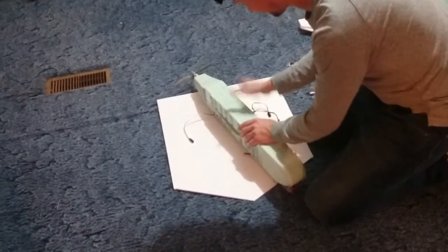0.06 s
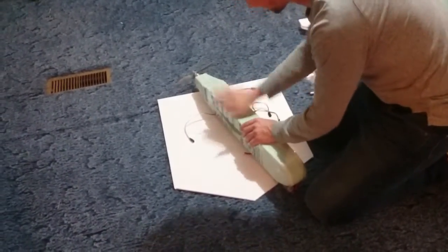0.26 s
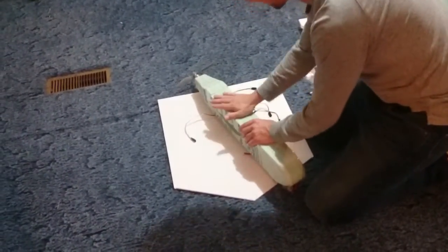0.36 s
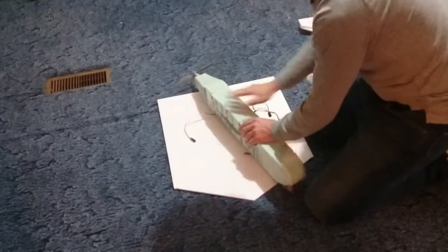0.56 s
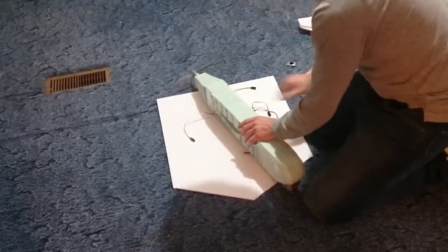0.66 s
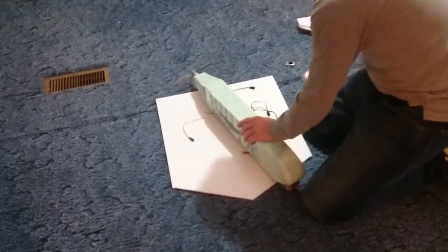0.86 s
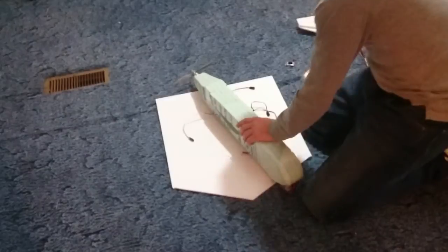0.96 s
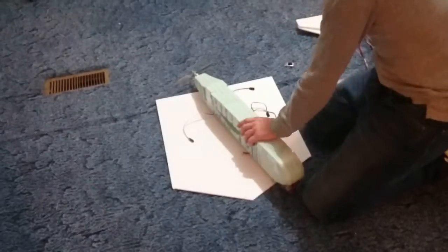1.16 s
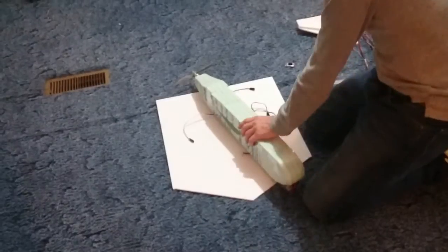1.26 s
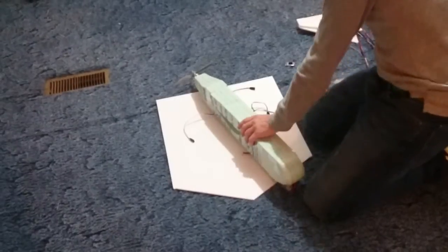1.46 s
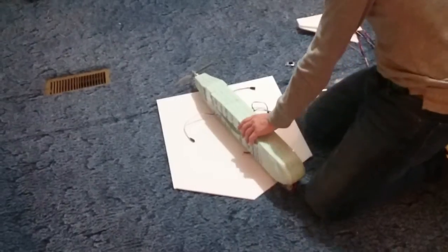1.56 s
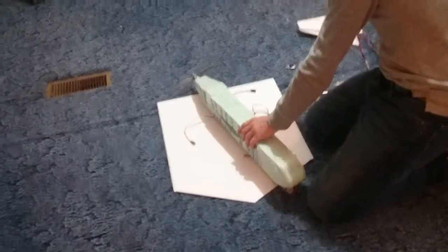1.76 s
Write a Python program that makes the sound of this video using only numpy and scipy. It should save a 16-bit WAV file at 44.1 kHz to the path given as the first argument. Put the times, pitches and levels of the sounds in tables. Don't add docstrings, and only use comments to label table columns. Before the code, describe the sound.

One hard, crackling slap on hollow foam in a small room, then quiet rubbing and plastic ticks

```python
import sys
import numpy as np
from scipy import signal
from scipy.fft import rfft, irfft
from scipy.io import wavfile
from scipy.ndimage import uniform_filter1d

SR = 44100
rng = np.random.default_rng(int(sys.argv[2]) if len(sys.argv) > 2 else 0)


def elevation(decibels):
    levels = np.asarray(decibels, float)
    return 10 ** (levels / 20)


def waveform_to_disk(signal):
    frames = np.transpose(np.atleast_2d(signal))
    scaled = np.clip(frames, -1, 1) * 32767
    samples = np.round(scaled).astype(np.int16)
    wavfile.write(sys.argv[1], SR, samples)


N = 79380
T = np.arange(N) / SR

# pitch_hz, likeness [0-1]
LIKENESS = [(60, 0.22), (500, 0.32), (2000, 0.057), (6000, 0.021), (14000, .01)]
# pitch_hz, t60_s
ROOM_T60 = [(60, 0.33), (500, 0.32), (2000, 0.21), (6000, 0.27), (14000, 0.15)]
ROOM_START_S = .004
# start_s, level_db, length_s, tilt_db [per octave, low over high]
SLAP = [
    (.2144, -25, .0006, 5),
    (.2166, -13, .0004, 5),
    (.2185, -17, .0012, 1),
    (.221, -21, .0015, 0),
    (.2242, -17, .0015, 5),
    (.2298, -16, .0015, -3),
    (.2322, -10, .0005, -4),
    (.2395, -16, .0025, -2),
    (.245, -20, .002, 0),
]


def rms_one(x):
    return x / np.sqrt(np.mean(x ** 2) + 1e-20)


def at_hz(points, hz):
    table_hz, value = np.array(points)[:, 0], np.array(points)[:, 1]
    return np.interp(np.log(hz), np.log(table_hz), value)


def high_pass(x, hz, order=2):
    return signal.sosfilt(signal.butter(order, hz, "high", fs=SR, output="sos"), x)


def drift(rate):
    span = int(SR / 80 / rate)
    slow = uniform_filter1d(rng.standard_normal(N // 40 + 2), span)
    slow = uniform_filter1d(slow, span)
    return np.interp(np.arange(N) / 40, np.arange(len(slow)), rms_one(slow))


def ring(x, hz, t60):
    r = elevation(-60 / (t60 * SR))
    w = 2 * np.pi * hz / SR
    return signal.lfilter([0, np.sin(w)], [1, -2 * r * np.cos(w), r * r], x + 1e-18)


def burst(s, length):
    x = rng.standard_normal(N) * np.exp(-.5 * ((T - s) / length) ** 2)
    return x / np.sqrt(np.sum(x ** 2) + 1e-20)


def bands(white, gain, likeness=LIKENESS):
    out = 0
    edges = 22 * 2 ** np.arange(0, 10, .5)
    for k, (low, high) in enumerate(zip(edges, np.minimum(edges[1:], 19000))):
        band = signal.butter(2, [low, high], "band", fs=SR, output="sos")
        mid, side = signal.sosfilt(band, white[k % 2])
        hz = np.sqrt(low * high)
        alike = np.clip(at_hz(likeness, hz), -1, 1)
        stereo = np.sqrt(1 + alike) * mid + np.sqrt(1 - alike) * side * [[1], [-1]]
        out = out + gain(hz) * stereo
    return out


def floor():
    # pitch_hz, level_db
    air_colour = [(40, -1.5), (90, -2), (180, -9.5), (600, -8.5), (2200, -6), (4200, -5.5), (7300, -20),
                  (16000, -12)]
    # pitch_hz, level_db
    fan_lines = [(120, -87), (126, -81)]
    width_hz = 0.5
    hum = 0
    for hz, db in fan_lines:
        line = ring(rng.standard_normal(N + SR), hz, 6.5 / width_hz)[SR:]
        hum = hum + elevation(db) * rms_one(line)
    air = bands(rng.standard_normal((2, 2, N + SR // 4)), lambda hz: elevation(at_hz(air_colour, hz)))[:, -N:]
    return elevation(-65) * rms_one(air) + hum


def rubs():
    # peak_s, level_db, rise_s, treble_db, body_db
    strokes = [(.004, -50, 0.022, -1.5, 11), (0.143, -57, 0.084, 3, 8), (0.389, -51.5, 0.048, 0.5, 15),
               (0.544, -52.5, 0.063, -1, -0.5), (0.609, -63, 0.17, 1.5, 9.5), (0.7, -58, 0.02, 3.5, 6),
               (0.717, -56.5, 0.079, -3.5, -6), (0.774, -52, 0.0099, 2, 1), (0.843, -60.5, 0.014, 0, -12),
               (0.948, -57, 0.034, 0.5, 16.5), (0.978, -59, 0.049, 2.5, 5), (1.108, -58, 0.039, -5.5, 5),
               (1.196, -54.5, 0.027, -2, -1), (1.278, -54, 0.0044, -0.5, 14.5),
               (1.317, -51.5, 0.05, -6.5, 4.5), (1.384, -57, 0.069, -7, 16), (1.434, -56, 0.064, -14, 2.5),
               (1.532, -60, 0.12, -27.5, 9.5), (1.577, -53, 0.049, -14, 5), (1.7, -60, 0.044, -20, -8),
               (1.749, -51, 0.023, 0.5, 6.5)]
    # pitch_hz, level_db [per Hz]
    colour = [(150, -17), (500, -18), (1300, -11), (2200, 5), (3000, 4.5), (4200, 4), (5800, -2),
              (16000, -7)]
    fall_s, grains_per_s, grain_db = 0.035, 2500, 1
    patchy_db, patches_per_s = 2, 18.4
    s, db, rise, treble_db, body_db = np.transpose(strokes)[:, :, None]
    envelope = np.where(T < s, np.exp(-2 * ((T - s) / rise) ** 2), np.exp(-(T - s) / fall_s))
    shape = elevation(db) * envelope

    strength = elevation(grain_db * np.minimum(rng.exponential(1, (2, 2, N)), 5))
    grains = strength * rng.choice([-1, 1], (2, 2, N))
    grains = grains * (rng.random((2, 2, N)) < grains_per_s / SR)

    def stroke_level(hz):
        treble = treble_db * np.clip(np.log2(hz / 5000), 0, 1)
        body = body_db * np.clip(np.log2(2200 / hz), 0, 1)
        return np.sqrt(((shape * elevation(treble + body)) ** 2).sum(axis=0))

    def gain(hz):
        return elevation(at_hz(colour, hz) + patchy_db * drift(patches_per_s)) * stroke_level(hz)

    scale = np.std(bands(grains, lambda hz: elevation(at_hz(colour, hz))))
    return bands(grains, gain) / scale


def creaks():
    # start_s, level_db, length_s, pitch_hz, t60_s
    slips = [(1.57, -51, .008, 1290, .022), (1.564, -52, .007, 1780, .02), (1.573, -56, .006, 2680, .015),
             (.2319, -10, .0004, 6050, .004), (1.315, -56, .015, 2070, .02), (1.31, -57, .015, 3300, .012),
             (.328, -45, .006, 2250, .01), (1.74, -49, .006, 2200, .015), (1.11, -62, .008, 2220, .015),
             (.008, -54, .008, 3600, .012), (.2324, -13, .0004, 2600, .008)]
    out = 0
    for s, db, length, hz, t60 in slips:
        y = ring(ring(burst(s, length), hz, t60), hz, t60 / 4)
        out = out + elevation(db) * y / np.abs(y).max()
    return out


def ticks():
    # start_s, level_db [peak], low_ring_db, treble_db, pan_db [left over right]
    contacts = [(0.0325, -46.5, -10, 15, 10), (0.064, -46, -8, 8, 4), (0.1042, -37, -5, -2, -5.5),
                (0.1278, -47, -4, -3, -12), (0.1322, -37, -2, -8, -0.5), (.3275, -59, -12, -10, 3),
                (0.379, -54, 18, -16, -24), (.698, -53, -18, 2, 18), (.743, -41.5, -3, 5, 7),
                (.766, -41, -17, 2, 16), (0.7748, -45, -6, -12, -6), (1.1897, -41, -8, 4, 2),
                (1.273, -49, -10, -6, 4), (1.7308, -41, -10, -6, 4), (1.7341, -33.5, -10, -3, 3),
                (1.7401, -39, -14, -8, 1), (1.7503, -50, 0, -6, -6)]
    # pitch_hz, level_db, t60_s
    parts = [
        (2200, 0, .005),
        (4200, 2, .004),
        (4850, 2, .004),
        (5500, -5, .004),
        (8500, -3, .002),
        (10500, -3, .002),
        (14000, -3, .0015),
    ]
    contact_s = 0.00061
    out = np.zeros((2, N))
    spread = rng.normal(0, 1, (30, len(parts)))
    for (s, db, low_db, treble_db, pan_db), own in zip(contacts, spread):
        i = int(s * SR)
        x = burst(s + 2 * contact_s, contact_s)[i - 200:i + 1500]
        y = 0
        for k, ((hz, level, t60), g) in enumerate(zip(parts, own)):
            colour_db = low_db if hz < 3000 else treble_db if hz > 7000 else 0
            y = y + (-1) ** k * elevation(level + colour_db + 2 * g) * ring(x, hz, t60)
        y = high_pass(y, 1560, order=4)
        pan = elevation(db + np.array([[.5], [-.5]]) * pan_db)
        out[:, i - 200:i + 1500] += pan * y / np.abs(y).max()
    return out


def room(x):
    t = T[:SR // 2]
    tail = bands(rng.standard_normal((2, 2, len(t))), lambda hz: elevation(-60 * t / at_hz(ROOM_T60, hz)))
    tail = tail * (1 - np.exp(-(t / ROOM_START_S) ** 2))
    return signal.fftconvolve(x, rms_one(tail) / np.sqrt(len(t)), axes=1)[:, :N]


def bumps():
    # start_s, level_db, pitch_hz, t60_s
    pushes = [(.236, -42, 88, .2), (.214, -44, 58, .3), (.33, -52, 60, .3), (.47, -63, 56, .25),
              (.2145, -40, 300, .07), (.2145, -47, 130, .08), (.2125, -41, 85, .06), (1.375, -61, 580, .05),
              (1.6068, -49, 520, .008), (1.61, -53, 205, .035), (1.73, -66, 75, .15)]
    out = 0
    for s, db, hz, t60 in pushes:
        decay = np.exp(-np.log(1000) * np.maximum(T - s, 0) / t60)
        onset = np.clip((T - s) * hz, 0, 1)
        out = out + elevation(db) * decay * np.sin(2 * np.pi * hz * (T - s)) * onset
    return out * elevation(np.array([[-2.5], [2.5]]))


def slap():
    # pitch_hz, level_db, t60_s
    shell = [(430, -18, 0.0042), (797, -19, 0.075), (1414, -11.5, 0.019), (2000, -10.5, 0.0011),
             (2380, 7, 0.0044), (3580, 7.5, 0.0034), (4430, 2, 0.0084), (5010, -27, 0.0013),
             (5790, 17, 0.0056), (7250, 9, 0.0023), (8840, 11.5, 0.0054), (10500, 1.5, 0.0016),
             (13100, -7.5, 0.0015), (15100, 10, 0.0033)]
    left_lag_s = .00005
    out = np.zeros(SR // 2)
    for s, db, length, tilt_db in SLAP:
        x = burst(s, length)[:len(out)]
        y = 0
        for k, (hz, level, t60) in enumerate(shell):
            y = y + (-1) ** k * elevation(level - tilt_db * np.log2(hz / 3000)) * ring(x, hz, t60)
        out += elevation(db) * y / np.abs(y).max()
    out = np.pad(high_pass(out, 210), (0, N - len(out)))
    return np.array([np.interp(T - left_lag_s, T, out), out])


def slap_tail():
    # pitch_hz, level_db [per Hz]
    colour = [(35, -12), (60, -7.5), (330, -8.5), (682, -3.5), (1060, -5.5), (1780, -2), (3040, -1),
              (6280, -6), (16000, -5.5)]
    # pitch_hz, likeness [0-1]
    alike = [(60, .95), (300, 0.99), (1000, 0.21), (4000, 0.1), (14000, .05)]
    patchy_db, patches_per_s = 2, 90
    s, db, length, _ = np.transpose(SLAP)[:, :, None]
    since = np.maximum(T - s, 0)
    energy = elevation(2 * db) * length * (1 - np.exp(-(since / ROOM_START_S) ** 2))

    def gain(hz):
        remaining = np.sqrt((energy * elevation(-120 * since / at_hz(ROOM_T60, hz))).sum(axis=0))
        return elevation(at_hz(colour, hz) + patchy_db * drift(patches_per_s)) * remaining

    tail = bands(rng.standard_normal((2, 2, N)), gain, alike)
    return elevation(-28.5) * tail / np.std(tail[:, int(.23 * SR):int(.26 * SR)])


def snaps(table):
    out = np.zeros(N)
    for s, db, length, hz, t60 in table:
        i = int(s * SR) - 1000
        y = high_pass(ring(burst(s, length)[i:i + 3000], hz, t60), hz / 2)
        out[i:i + 3000] += elevation(db) * y / np.abs(y).max()
    return out


def cracks():
    # start_s, level_db, length_s, pitch_hz, t60_s
    skin_and_foam = [(.2163, -13, .00008, 1700, .0015), (.2165, -22, .0003, 8600, .001),
                     (.2166, -25, .0003, 13000, .0006), (.2184, -18, .0001, 5800, .001),
                     (.2184, -22, .0002, 9700, .001), (.2196, -19, .0002, 900, .004),
                     (.2243, -20, .0006, 1700, .002), (.2285, -26, .0012, 6000, .001),
                     (.2311, -19, .0006, 9600, .0015), (.232, -21, .001, 14800, .0008),
                     (.2321, -12, .0003, 5600, .0015), (.2388, -25, .0004, 8500, .0008),
                     (.24, -23, .0012, 6100, .003), (.2435, -28, .001, 2500, .003),
                     (.252, -27, .001, 2200, .003), (.2665, -29, .001, 1500, .002),
                     (.2765, -29, .0008, 1900, .003), (.3262, -36, .0015, 2900, .004),
                     (.3375, -46, .001, 2200, .004), (.3815, -47, .001, 2130, .004),
                     (.258, -33, .009, 2300, .008), (.262, -36, .009, 6300, .004),
                     (.305, -41, .009, 2150, .008), (.346, -48, .005, 2200, .008)]
    return snaps(skin_and_foam)


def ports(x):
    # pitch_hz, level_db [left over right]
    balance = [(60, -12.5), (550, -1.5), (2500, -8), (4300, 2.5), (6000, -5.5), (9000, 9.5), (14000, -4.5)]
    lean_db = at_hz(balance, np.maximum(np.arange(N // 2 + 1) * SR / N, 1))
    return irfft(rfft(x) * elevation(lean_db * [[.5], [-.5]]), N)


def scrapes():
    # start_s, level_db, length_s, pitch_hz, t60_s
    catches = [(1.7338, -45, .0006, 4800, .002), (1.745, -47, .002, 4700, .003),
               (1.749, -45, .001, 4900, .002), (1.7525, -45, .001, 2600, .003),
               (1.754, -49, .0006, 6000, .002), (1.2745, -48, .0004, 4500, .002),
               (1.2755, -53, .0006, 2200, .001), (1.31, -50, .001, 3400, .002),
               (1.386, -53, .001, 2800, .003), (1.422, -54, .002, 3900, .003),
               (1.504, -55, .002, 3700, .003), (.7435, -47, .0004, 4400, .002),
               (1.1906, -39, .0005, 4350, .004), (1.1882, -48, .0006, 4200, .003),
               (1.6075, -60, .0002, 1000, .002), (1.7355, -46, .0004, 10500, .001),
               (.7185, -52, .001, 2300, .003), (.704, -52, .001, 4300, .003)]
    return snaps(catches)


def scene():
    small = ticks()
    handling = rubs() + small + creaks() + scrapes()
    knock = ports(slap() + slap_tail()) + ports(cracks()) + bumps()
    return handling + knock + room(elevation(-9) * small) + floor()


def top_cut(x):
    return signal.sosfilt(signal.butter(12, 16470, fs=SR, output="sos"), x)


def record(dry):
    top = signal.cheby2(24, 28, 15950, fs=SR, output="sos")
    mix = signal.sosfilt(top, high_pass(dry, 44, order=4))
    return top_cut(mix)


dry = scene()
out = record(dry)
waveform_to_disk(out)
```